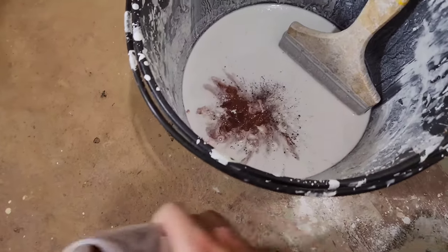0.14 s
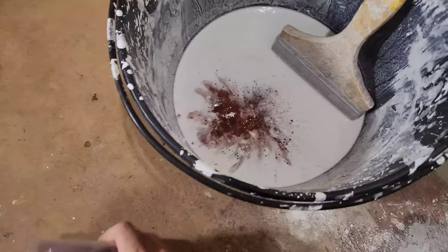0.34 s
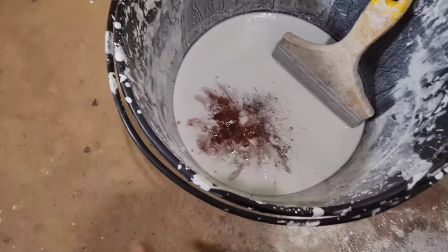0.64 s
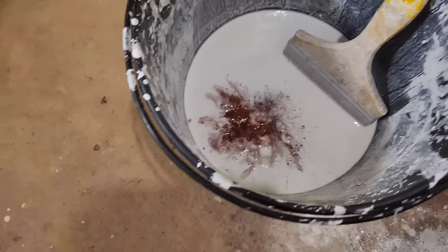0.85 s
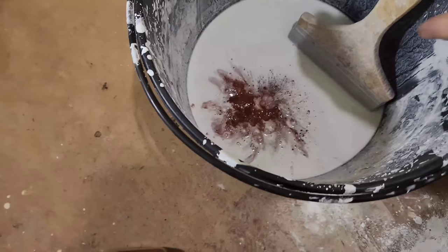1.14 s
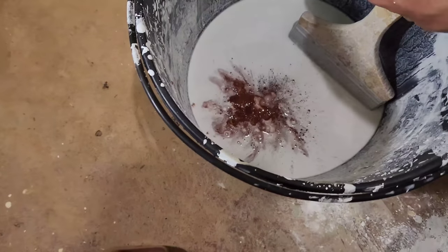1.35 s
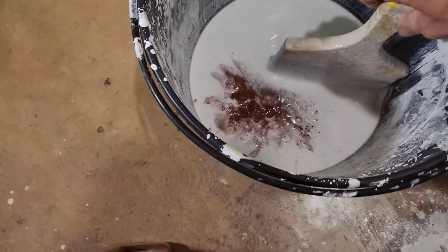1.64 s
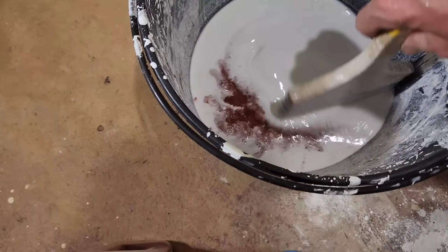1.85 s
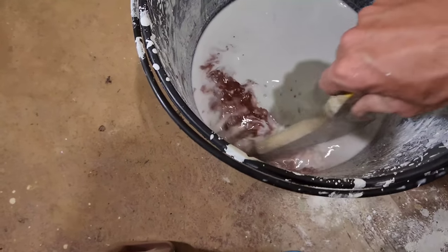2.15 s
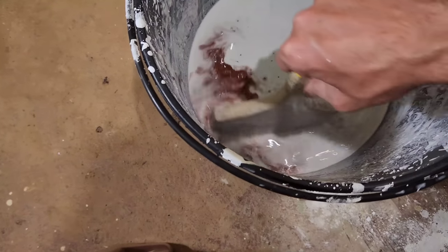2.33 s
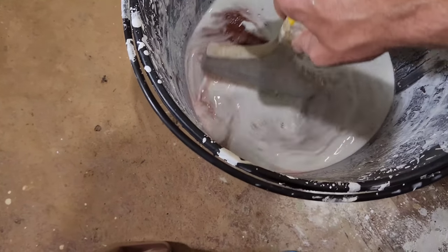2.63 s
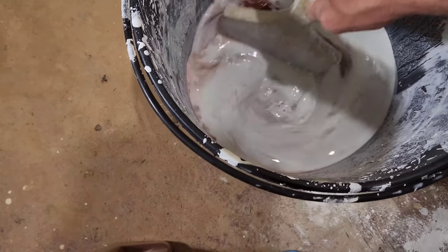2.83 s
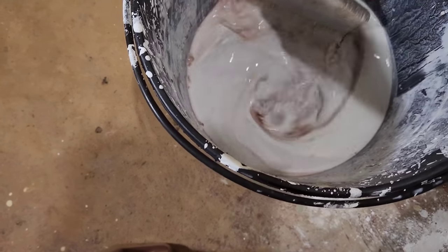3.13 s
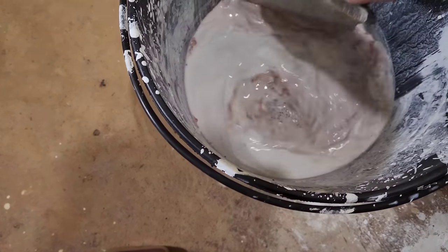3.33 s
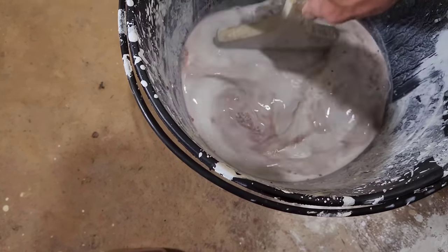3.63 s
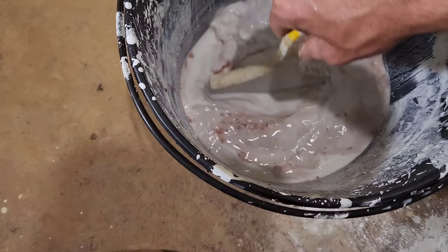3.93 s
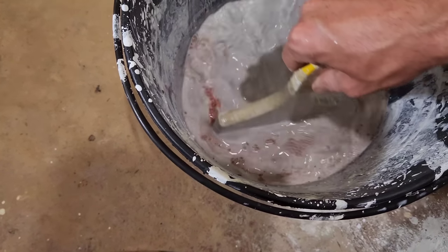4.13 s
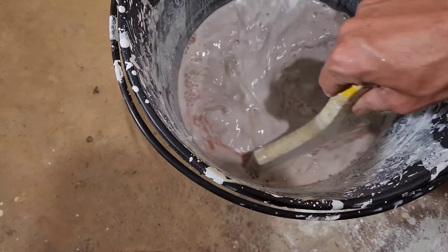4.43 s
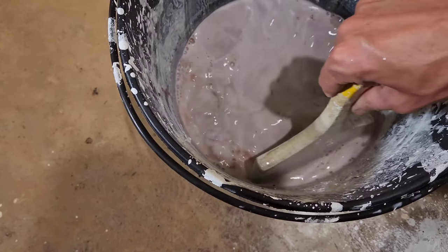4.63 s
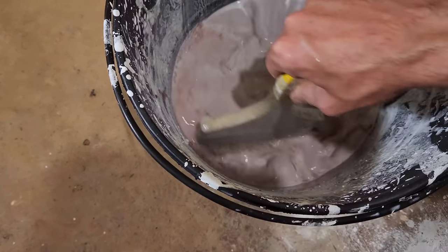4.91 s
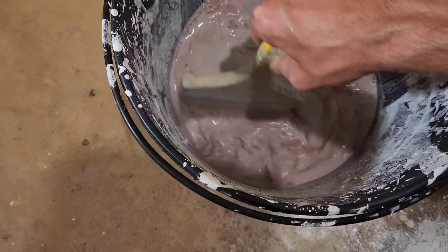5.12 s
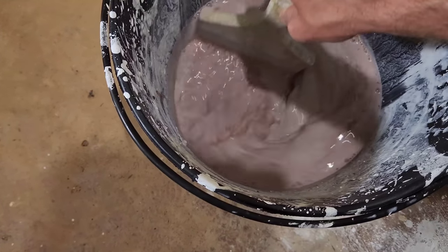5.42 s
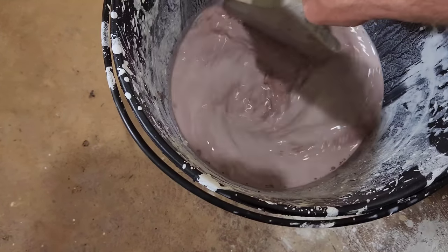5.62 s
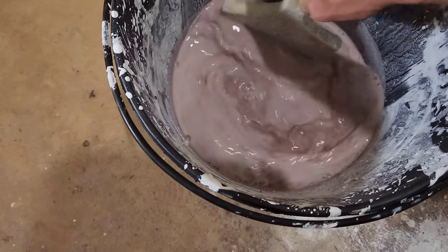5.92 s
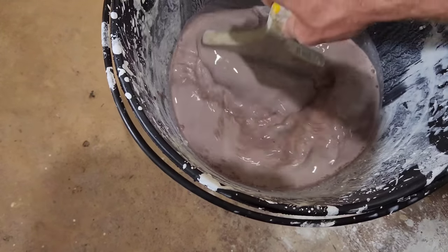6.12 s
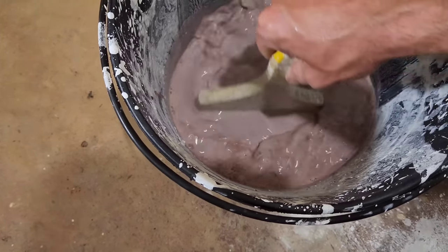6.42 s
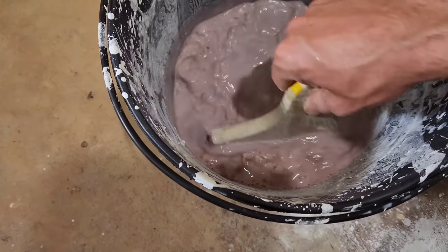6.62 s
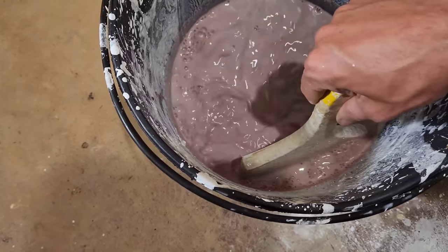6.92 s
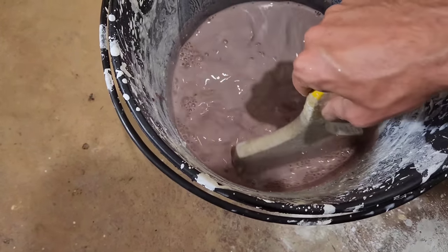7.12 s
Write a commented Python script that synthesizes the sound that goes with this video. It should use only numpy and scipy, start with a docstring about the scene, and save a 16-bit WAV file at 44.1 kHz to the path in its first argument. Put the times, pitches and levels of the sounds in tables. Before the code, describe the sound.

A faint low rustle and a few small dry ticks open the sound. At about 0.6 seconds an object lands on a hard floor with a dull, briefly booming thud, then slides aside with a short gritty scrape that stops near 1 second. From about 1.5 seconds a wide brush begins softly stirring thin paint in a plastic bucket, and its handle knocks lightly on the wall once at about 1.8 seconds. From around 2.7 seconds, short bubble plops and crisp wet snaps multiply over uneven, hissing sloshes. The stirring swells at about 4 seconds and keeps going, with a slightly hollow churning from inside the bucket. The strongest strokes come from about 6.2 seconds to the end, just past 7 seconds. Everything sounds close, with a faint hiss and a slowly growing low rumble underneath.

```python
"""After a low rustle and a few handling ticks, something is set down on a hard floor with a thud and
slid aside. Then a wide brush starts to stir thin paint in a plastic bucket, and its handle knocks the
wall once. The strokes grow ever stronger: trapped air rings as short bubbles, paint films snap, the
slosh hisses and the air in the bucket churns. A low rumble and a faint hush lie under it all."""
import sys
import numpy as np
from scipy import signal
from scipy.fft import rfft, irfft
from scipy.io import wavfile

SR = 44100
rng = np.random.default_rng(int(sys.argv[2]) if len(sys.argv) > 2 else 0)


def persist_wave(psi):
    """Save psi, clipped to +-1, as 16-bit WAV."""
    counts = np.round(np.clip(psi, -1, 1) * 32767).astype(np.int16)
    wavfile.write(sys.argv[1], SR, np.atleast_2d(counts).T)


N = 320166

# wet midrange of bubbling paint: f/Hz, level/dB
GURGLE_SPECTRUM = [(150, -48), (250, -4), (403, -21.5), (498, -50), (609, -18.5), (1320, 0), (1500, -1),
                   (1830, -1), (5000, -10.5), (6500, -44), (11000, -120)]
# bright fizz of fine spray: f/Hz, level/dB
SPATTER_SPECTRUM = [(700, -57), (1800, -38), (2800, -12.5), (4700, -5), (5600, -3.5), (9900, -9),
                    (14100, -1.5), (15200, -1), (16200, -28)]
# dull noise of blows and handling: f/Hz, level/dB
CLUNK_SPECTRUM = [(100, -15), (300, 5.5), (1500, -16.5), (2600, -11), (5000, -16), (15000, -20),
                  (17000, -60)]


def stirring():
    """Gurgle and spatter envelopes in dB: paint gathers before each stroke and calms after it."""
    # brush strokes: t/s (fully swollen), hold/s, gurgle level/dB, spatter level/dB
    strokes = [(1.52, 0.17, -76.5, -66), (1.8, 0.3, -78.5, -67), (2.3, 0.054, -68.5, -69.5),
               (2.549, 0.19, -69.5, -63.5), (2.97, 0.47, -78.5, -65.5), (3.45, 0.039, -64, -64),
               (3.7, 0.31, -61.5, -61.5), (3.989, 0.22, -53, -50), (4.6, 0.072, -61, -57.5),
               (4.74, .15, -54.5, -60), (5.0, .24, -61.5, -59.5), (5.61, 0.17, -53.5, -56),
               (6.2, 0.031, -49.5, -61), (6.291, 0.11, -40.5, -40), (6.481, 0.14, -42.5, -50.5),
               (6.8, 0.19, -45.5, -53.5), (7.04, .25, -46, -46)]
    swell_db_per_s, settle_db_per_s = 149, 160
    t = np.arange(N) / SR
    calm_db = np.array([[-94.5], [-80]]) + 2.5 * t   # between strokes the paint gets ever more restless
    power = from_db(2 * calm_db) * (t > 1.0) + 1e-12
    for start, hold, *db in strokes:
        swell_db = swell_db_per_s * np.maximum(start - t, 0)
        settle_db = settle_db_per_s * np.maximum(t - start - hold, 0)
        power = power + from_db(2 * (np.array(db)[:, None] - swell_db - settle_db))
    return 10 * np.log10(power)


def paint(gurgle_db, spatter_db):
    """Stirred paint: swarms of small bubbles and fluttering wet noise, with single pops on top."""
    gurgle = swarm(gurgle_db, GURGLE_SPECTRUM, 528, 4036, cycles=52, spread_db=2, count=4500, size=900)
    spatter = swarm(spatter_db, SPATTER_SPECTRUM, 2830, 14700,
                    cycles=34, spread_db=4, count=4000, size=250)
    slosh = from_db(gurgle_db - 7 + np.minimum(7.1 * drift(30), 7)) * stereo_noise(GURGLE_SPECTRUM)
    hiss = from_db(spatter_db - 7 + 6.7 * drift(52)) * stereo_noise(SPATTER_SPECTRUM)
    wet = gurgle + spatter + slosh + hiss + flecks(spatter_db) + large_bubbles() + snaps() + bristles()
    low_cut = signal.butter(3, 310, "high", fs=SR, output="sos")   # the wet paint sounds only above about 300 Hz
    return signal.sosfilt(low_cut, wet)


def large_bubbles():
    """Pockets of trapped air ring out singly, each with a wet smack."""
    # bubbles that stand out: t/s, level/dB, f/Hz, t60/s
    bubbles = [(2.69, -47, 690, 0.027), (2.695, -32, 1400, .014), (2.795, -50, 2370, 0.035),
               (2.94, -40.5, 1780, 0.016), (2.949, -36, 3130, 0.014), (2.997, -45, 1250, 0.066),
               (3.045, -48.5, 2780, 0.044), (3.151, -55, 1220, 0.08), (3.18, -41.5, 1470, 0.037),
               (3.203, -38.5, 2330, 0.03), (3.285, -40, 2430, 0.019), (3.309, -36.5, 3090, 0.037),
               (3.428, -47.5, 960, 0.031), (3.442, -33.5, 833, 0.028), (3.509, -28, 930, 0.011),
               (3.567, -30.5, 2000, 0.021), (3.608, -22.5, 1639, .029), (3.679, -52, 330, 0.067),
               (3.683, -36.5, 1425, 0.037), (3.7, -37.5, 1067, 0.03), (3.765, -38, 828, 0.03),
               (3.812, -30.5, 1556, 0.031), (3.865, -35.5, 1870, 0.015), (3.918, -45, 962, 0.052),
               (3.936, -32, 1110, 0.017), (3.977, -46, 524, 0.086), (3.982, -43.5, 740, 0.091),
               (4.025, -41, 463, 0.035), (4.026, -42.5, 1390, 0.085), (4.099, -49, 342, 0.073),
               (4.046, -38.5, 1058, 0.14), (4.085, -31, 1190, 0.048), (4.095, -28.5, 2064, 0.041),
               (4.121, -30.5, 2020, .025), (4.155, -33, 1073, 0.033), (4.177, -36.5, 940, 0.051),
               (4.22, -36.5, 2340, 0.023), (4.27, -35, 1480, 0.018), (4.292, -32.5, 985, 0.041),
               (4.3, -39.5, 3104, 0.043), (4.472, -34, 2426, 0.019), (4.579, -33, 1540, .02),
               (4.7, -38.5, 2590, 0.063), (4.72, -37.5, 1930, .03), (4.74, -37, 1680, 0.025),
               (4.791, -55, 342, 0.099), (4.792, -33.5, 1270, 0.025), (4.871, -43.5, 1177, 0.082),
               (4.945, -35, 1176, .057), (5.0, -41, 787, 0.036), (5.036, -35.5, 2190, 0.02),
               (5.157, -28, 1896, 0.018), (5.257, -33.5, 3190, 0.025), (5.38, -37.5, 2220, 0.011),
               (5.42, -35, 3040, 0.019), (5.585, -31, 1730, 0.024), (5.61, -39, 1052, 0.15),
               (5.627, -31.5, 1273, 0.046), (5.669, -32, 1710, 0.028), (5.769, -40, 2180, 0.027),
               (5.81, -29, 2510, 0.019), (5.843, -21, 1480, 0.043), (5.928, -38.5, 2080, 0.028),
               (6.089, -40.5, 2240, 0.023), (6.176, -26, 2900, 0.016), (6.176, -45.5, 668, 0.073),
               (6.23, -49, 657, 0.13), (6.212, -36, 768, 0.069), (6.245, -36, 1230, .029),
               (6.285, -27, 1187, .035), (6.298, -33, 509.5, 0.16), (6.339, -40, 501, .1),
               (6.363, -20.5, 1570, 0.049), (6.399, -41.5, 503, 0.2), (6.262, -29, 3170, 0.023),
               (6.342, -30, 2290, 0.014), (6.47, -34, 1220, .035), (6.43, -31.5, 1020, 0.039),
               (6.525, -28, 750, 0.034), (6.566, -25, 1110, .023), (6.592, -30.5, 740, 0.021),
               (6.675, -36.5, 796, 0.13), (6.737, -31, 1635, 0.044), (6.807, -27, 2510, .035),
               (6.867, -27.5, 700, 0.014), (6.921, -42.5, 362, 0.058), (6.905, -23, 1700, 0.024),
               (7.031, -20.5, 3335, 0.02), (7.062, -21.5, 966, 0.013), (7.099, -30.5, 2010, 0.028),
               (7.121, -30, 2080, 0.028), (7.161, -32.5, 1134, 0.025), (7.182, -43, 2050, 0.025),
               (7.2, -52, 330, 0.1), (7.215, -42, 1610, 0.014), (7.246, -28.5, 903, 0.032)]
    s, db, hz, t60 = np.transpose(bubbles)
    attack_s = 0.0018
    rings = pings(s, db, hz, t60, size=4500, pan_db=brush_pan(s, hz), rise=0.049, rough=0.37,
                  lag_s=0.00003, droop=1.096, attack_cycles=attack_s * hz[:, None])
    smacks = burst(s, db - 19, t60=0.049, colour=GURGLE_SPECTRUM)
    return rings + smacks


def snaps():
    """A paint film bursts: a brief ring at its own pitch and a bright spit of noise."""
    # bursting films: t/s, ring level/dB, f/Hz, spit level/dB
    films = [(1.105, -56, 9000, -63), (1.241, -38, 11800, -59), (1.459, -54, 8960, -62),
             (1.51, -40, 12100, -52), (1.956, -49, 7000, -49.5), (1.6246, -33, 5890, -49),
             (2.0255, -38.5, 4800, -48), (2.696, -34, 12700, -55), (2.812, -48, 7160, -48.5),
             (2.968, -47, 6600, -46.5), (3.022, -49, 7000, -62), (3.076, -50, 7940, -71),
             (3.18, -55, 6000, -51), (3.2038, -41, 3220, -47), (3.3058, -35, 4360, -37),
             (3.352, -41, 4600, -61), (3.382, -39.5, 4000, -65), (3.5187, -40.5, 4200, -43.5),
             (3.6008, -33, 5600, -35), (3.7393, -23, 6600, -49), (3.826, -27, 4640, -60),
             (3.8666, -21, 14000, -36), (3.976, -37, 5000, -47), (3.9991, -15.5, 9000, -28.5),
             (4.002, -13.5, 13000, -51), (4.0288, -20, 12200, -54), (4.1403, -28, 9050, -36),
             (4.178, -26, 15200, -39), (4.1898, -24, 7030, -55), (4.2088, -22.5, 15100, -56),
             (4.4733, -44, 3460, -46), (4.597, -29.5, 8560, -38), (4.7285, -44, 5300, -38),
             (4.8663, -30, 7100, -34), (4.901, -19, 10230, -38), (5.096, -19, 13600, -42),
             (5.257, -32.5, 3800, -41.5), (5.3716, -22.5, 15800, -69), (5.606, -33, 4930, -42),
             (5.6213, -25.5, 3920, -48), (5.8412, -36, 13500, -33.5), (5.891, -30, 5270, -41),
             (5.9634, -28, 5180, -39.5), (6.091, -37, 5760, -57), (6.1323, -33.5, 6700, -59),
             (6.1771, -20.5, 12500, -39), (6.213, -28.5, 4040, -35), (6.2544, -27.5, 3540, -27.5),
             (6.314, -27, 4430, -37), (6.4632, -15, 5470, -26.5), (6.558, -35, 4530, -32),
             (6.6153, -28.5, 12200, -40), (6.6593, -27, 7400, -43), (6.738, -29.5, 3660, -34.5),
             (6.812, -23.5, 6300, -43), (6.893, -23, 14200, -46), (6.9218, -30, 4150, -32),
             (7.062, -20, 13000, -32), (7.133, -21, 7970, -35.5), (7.196, -27.5, 4130, -53),
             (7.244, -32, 3800, -31)]
    s, db, hz, spit_db = np.transpose(films)
    ring_cycles = 45
    rings = pings(s, db, hz, ring_cycles / hz, size=500, pan_db=brush_pan(s, hz), rise=0.083,
                  rough=0.61, lag_s=0.00003, attack_cycles=0.54)
    return rings + burst(s, spit_db, t60=0.02, colour=SPATTER_SPECTRUM)


def brush_pan(s, hz):
    """Pops scatter to either side of the moving brush; lower ones stay nearer the middle."""
    # where the brush is: t/s, left over right/dB
    path = [(1.5, -1), (3.0, 2), (3.6, 0), (4.15, -2.5), (4.6, 0.5), (5.3, 3), (6.0, -4.5), (6.6, -0.5),
            (7.26, 4.5)]
    pan_db = np.interp(s, *np.transpose(path)) + 4.5 * rng.standard_normal(len(s))
    return pan_db * np.minimum(hz / 3300, 1)


def swarm(level_db, colour, low_hz, high_hz, cycles, spread_db, count, size):
    """Many small bubbles ring at random moments, swelling in clumps, a few much louder than the rest."""
    when, pitch, chance, side = rng.random((count, 4)).T
    s = when * N / SR
    hz = low_hz * (high_hz / low_hz) ** pitch
    clump_db = 6.6 * drift(10.9)[(s * SR).astype(int)]
    accent_db = -spread_db * np.log(np.maximum(chance, 0.01))
    db = at_hz(colour, hz) + 20 * np.log10(hz) + clump_db + accent_db
    rings = pings(s, db, hz, cycles / hz, size, pan_db=4.6 * (side - 0.5),
                  rise=0.27 * chance[:, None], rough=0.19)
    return from_db(level_db) * rms_one(rings)


def flecks(spatter_db, count=260, spread_db=4):
    """Drops land at random: crisp smacks that ride the spatter envelope."""
    when, chance = rng.random((count, 2)).T
    db = spatter_db[(when * N).astype(int)] + 0.5 - spread_db * np.log(np.maximum(chance, 0.02))
    return burst(when * N / SR, db, t60=0.013, colour=SPATTER_SPECTRUM, swell_s=0.00046)


def bristles():
    """Bristles touch the wall: soft, rough notes."""
    # touches: t/s, level/dB, f/Hz
    touches = [(1.505, -53.5, 1230), (1.595, -57, 1170), (1.863, -58.5, 1630), (1.94, -63, 1375),
               (2.017, -58.5, 1130), (2.284, -64, 2150), (2.313, -54.5, 890), (2.443, -53.5, 785)]
    s, db, hz = np.transpose(touches)
    return pings(s, db, hz, t60=np.full(len(s), 0.16), size=8000,
                 rise=0.036, rough=0.65, attack_cycles=3.6)


def churn(gurgle_db):
    """Paint folding over stirs the bucket's air column, in step with the gurgle."""
    # air resonances: f/Hz, bandwidth/Hz, level/dB
    air_modes = [(149, 35, -13), (329, 26, -5.5), (547, 13.4, -15.5), (782, 25, 0), (1032, 70, -2)]
    drive_db = -50.5 + 0.99 * (gurgle_db + 61.5)
    lumps = from_db(drive_db + 4.9 * drift(20.4)) * stereo_noise([(50, 0), (5000, 0)])
    hollow = 0
    for hz, width_hz, db in air_modes:
        r = np.exp(-np.pi * width_hz / SR)
        feedback = [1, -2 * r * np.cos(2 * np.pi * hz / SR), r * r]
        hollow = hollow + from_db(db) * signal.lfilter([1 - r, 0, r - 1], feedback, lumps)
    return hollow


def knock():
    """The brush handle knocks the plastic wall."""
    # bucket wall resonances: f/Hz, level/dB, t60/s
    wall_modes = [(70.3, -2.5, 1), (354, -2, 0.24), (573, 1, 0.052), (875, 13, 0.021), (1314, 14.5, 0.022),
                  (1620, 10.5, 0.03), (2210, 2.5, 0.031)]
    return blow(wall_modes, start_s=1.777, level_db=-43.5, clunk_db=-11.5, clunk_t60=0.27)


def thud():
    """An object lands on the hard floor and both boom briefly."""
    # floor and object resonances: f/Hz, level/dB, t60/s
    floor_modes = [(70.4, -4, 0.48), (84.6, -0.5, 0.44), (114.5, -8, 0.63), (200, -8.5, 0.14),
                   (360, -16, 0.31), (510, -7, 0.061), (541, -28, 0.52), (760, -22, 0.068),
                   (1590, -14.5, 0.019)]
    return blow(floor_modes, start_s=0.621, level_db=-27.5, clunk_db=-14, clunk_t60=0.18)


def blow(modes, start_s, level_db, clunk_db, clunk_t60):
    """One blow sets every mode of a body ringing, with a dull noisy clunk."""
    hz, db, t60 = np.transpose(modes)
    rings = pings(np.full(len(hz), start_s), level_db + db, hz, t60, size=30000, attack_cycles=0.73)
    return rings + burst(start_s, level_db + clunk_db, clunk_t60, CLUNK_SPECTRUM)


def slide():
    """Grit rasps under the sliding object; each push swells, then stops short."""
    # pushes: start t/s, loudest t/s, level/dB
    pushes = [(0.426, 0.56, -61.5), (0.66, 0.958, -47.5)]
    # tone of the scrape: f/Hz, level/dB
    grit_spectrum = [(120, -19), (200, -6.5), (278, -11), (722, -3), (1230, -13), (1710, -9.5),
                     (5630, -10.5), (9060, -18), (14600, -11), (16000, -12.5)]
    swell_db_per_s, stop_db_per_s = 61, 284
    t = np.arange(N) / SR
    gain = 0
    for start, top, db in pushes:
        fade_db = swell_db_per_s * np.maximum(top - t, 0) + stop_db_per_s * np.maximum(t - top, 0)
        gain = gain + (t > start) * from_db(db - fade_db)
    return gain * from_db(0.8 * drift(60)) * stereo_noise(grit_spectrum)


def ticks():
    """Short dry ticks as things are handled."""
    # small contacts: t/s, level/dB, f/Hz, t60/s
    contacts = [(0.113, -54, 14500, 0.007), (0.141, -51, 3500, 0.0094), (0.38, -49, 13500, 0.008),
                (0.428, -52, 580, 0.028), (0.476, -42, 5950, 0.0072), (0.547, -44, 4400, 0.017),
                (0.699, -33, 12000, 0.0071), (1.12, -46.5, 6450, 0.0083)]
    s, db, hz, t60 = np.transpose(contacts)
    return pings(s, db, hz, t60, size=1500, rough=0.71)


def rustle():
    """A low handling rustle dies away at the start."""
    return from_db(3.8 * drift(5.3)) * burst(0, db=-67, t60=1.8, colour=CLUNK_SPECTRUM)


def bucket_echo(x, wet_db=-8, low_t60=0.27, treble_t60=0.11):
    """Bucket and near floor return a short tail; the wet walls swallow the treble sooner."""
    # tone of the reflections: f/Hz, level/dB
    echo_spectrum = [(100, -11), (400, -4), (1500, -9.5), (3000, -4), (6000, -3.5), (16000, -11.5)]
    t = np.arange(SR // 3) / SR
    noise = stereo_noise(echo_spectrum)[:, :len(t)]
    low = signal.sosfilt(signal.butter(2, 3060, fs=SR, output="sos"), noise)
    tail = low * from_db(-60 * t / low_t60) + (noise - low) * from_db(-60 * t / treble_t60)
    tail *= t > 0.0015   # pre-delay
    tail /= np.sqrt(np.sum(tail ** 2, axis=1, keepdims=True))
    return x + from_db(wet_db) * signal.fftconvolve(x, tail, axes=1)[:, :N]


def rumble():
    """A deep bed of noise that slowly grows."""
    # swell: t/s, level/dB
    swell = [(0.0, -68.5), (0.85, -62), (1.3, -63), (2.26, -63.5), (2.85, -60), (5.1, -56.5), (7.26, -55.5)]
    # tone of the rumble: f/Hz, level/dB
    rumble_spectrum = [(8.8, -23), (15, 8), (65, 12.5), (120, 1.5), (146, -22), (194, -19), (237, -11),
                       (270, -24), (334, -6.5), (402, -21), (450, -52), (580, -80), (990, -120)]
    level_db = np.interp(np.arange(N) / SR, *np.transpose(swell))
    return from_db(level_db) * stereo_noise(rumble_spectrum)


def hush():
    """Faint broad noise whose level wavers."""
    # tone of the hush: f/Hz, level/dB
    hush_spectrum = [(80, -54), (130, -1), (330, -9), (550, -16.5), (1300, -10.5), (1800, -15), (2800, -17),
                     (5000, -19), (8000, -14.5), (9800, -37), (12500, -11), (15500, -15.5), (16200, -47)]
    return from_db(-71 + 2 * drift(7.6)) * stereo_noise(hush_spectrum)


def pings(s, db, hz, t60, size, pan_db=0, rise=0, rough=0, droop=0.86, lag_s=0.00008, attack_cycles=1):
    """Damped sines, size samples long; rise bends the pitch up, as when a bubble nears the surface."""
    out = np.zeros((2, N + size))
    lag = lag_s * rng.standard_normal((len(s), 1))   # each reaches one side a little later
    at = np.clip(s * SR, 0, N - 1).astype(int)[:, None] + np.arange(size)
    hz, t60 = hz[:, None], np.maximum(t60, 1e-4)[:, None]
    wobble = 0
    if rough:   # wandering phase: a bubble's wall is never still
        wobble = rough * np.cumsum(rng.standard_normal(at.shape), axis=1) * np.sqrt(hz / SR)
    for channel, sign in enumerate((1, -1)):
        t = np.maximum(np.arange(size) / SR - np.maximum(sign * lag, 0), 0)
        tone = np.sin(2 * np.pi * hz * t * (1 + rise * t / t60) + wobble)
        attack = 1 - np.exp(-t * hz / attack_cycles)
        decay = from_db(-60 * (t / t60) ** droop)   # droop over 1: holds, then falls away
        gain = from_db(db + sign * pan_db / 2)[:, None]
        out[channel] = np.bincount(at.ravel(), (gain * attack * decay * tone).ravel(), N + size)
    return out[:, :N]


def burst(s, db, t60, colour, swell_s=0.00038):
    """Noise that swells fast and dies away at each time in s."""
    triggers = np.zeros(N)
    triggers[(np.asarray(s) * SR).astype(int)] = from_db(db)
    decay = signal.lfilter([1], [1, -from_db(-60 / (t60 * SR))], triggers + 1e-18)
    swell = np.exp(-1 / (swell_s * SR))
    return signal.lfilter([1 - swell], [1, -swell], decay) * stereo_noise(colour)


def stereo_noise(colour):
    """Coloured noise of rms 1, centred in the bass and wide in the treble."""
    # stereo image: f/Hz, left-right correlation
    likeness = [(60, 1), (180, 0.89), (550, 0.44), (1650, 0.038), (4970, -0.19), (15000, -0.036)]
    hz = np.maximum(np.arange(N // 2 + 1) * SR / N, 1)
    mid, side = rfft(rng.standard_normal((2, N))) * from_db(at_hz(colour, hz))
    alike = at_hz(likeness, hz)
    return rms_one(irfft(np.sqrt(1 + alike) * mid + np.sqrt(1 - alike) * side * [[1], [-1]], N))


def drift(rate_hz):
    """Smooth random modulation with an rms of about 1."""
    hop, run_in = 40, 2000
    r = np.exp(-2 * np.pi * hop * rate_hz / SR)
    noise = rng.standard_normal(N // hop + run_in + 2)
    slow = signal.lfilter([1], [1, -2 * r, r * r], noise)[run_in:]
    return np.interp(np.arange(N) / hop, np.arange(len(slow)), rms_one(slow))


def at_hz(points, hz):
    """A curve read on a log-frequency axis."""
    point_hz, values = np.transpose(points)
    return np.interp(np.log(hz), np.log(point_hz), values)


def from_db(db):
    """Gain of a level in dB."""
    return 10 ** (np.asarray(db) / 20)


def rms_one(x):
    """The signal scaled to rms 1."""
    return x / np.sqrt(np.mean(x ** 2) + 1e-20)


def scene():
    """Paint, blows and ticks in the bucket's echo, with churn, slide and rustle, over rumble and hush."""
    gurgle_db, spatter_db = stirring()
    action = paint(gurgle_db, spatter_db) + knock() + thud()
    bed = rumble() + hush()
    return bucket_echo(action + ticks()) + churn(gurgle_db) + slide() + rustle() + bed


def record(dry):
    """The two microphone ports differ in the treble; the top is cut above about 16 kHz."""
    # balance of the ports: f/Hz, left over right/dB
    balance = [(60, 0.5), (3000, 0.5), (5500, -1.5), (8000, 5.5), (10000, 1.5), (12500, -1), (15000, -4.5)]
    hz = np.maximum(np.arange(N // 2 + 1) * SR / N, 1)
    tilt_db = at_hz(balance, hz) / 2 * [[1], [-1]]
    tilted = irfft(rfft(dry) * from_db(tilt_db), N)
    return signal.sosfilt(signal.cheby2(12, 70, 16500, fs=SR, output="sos"), tilted)


dry = scene()
out = record(dry)
persist_wave(out)
```